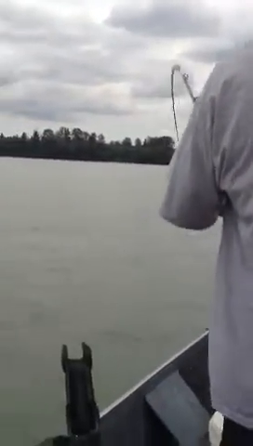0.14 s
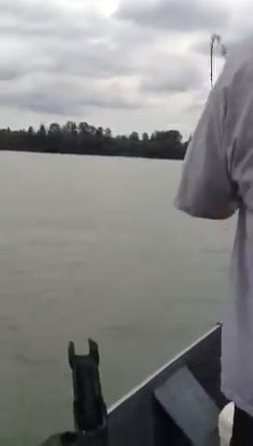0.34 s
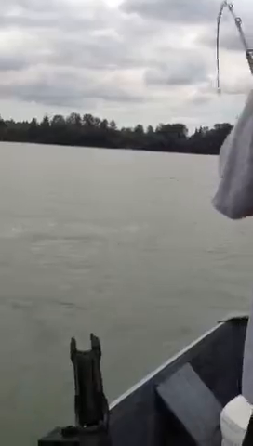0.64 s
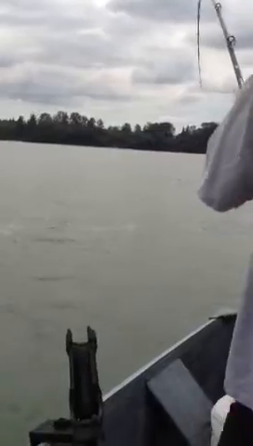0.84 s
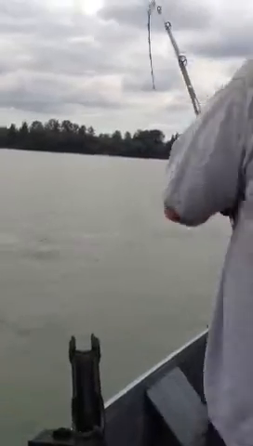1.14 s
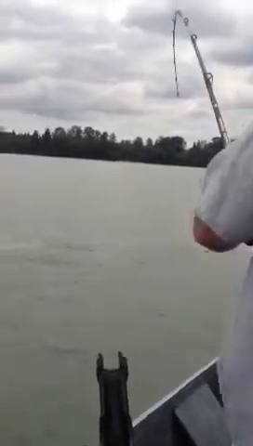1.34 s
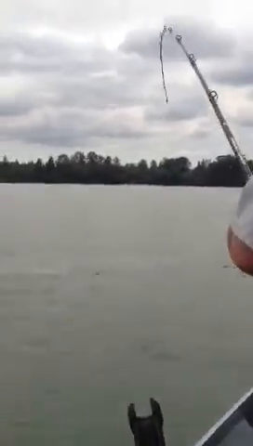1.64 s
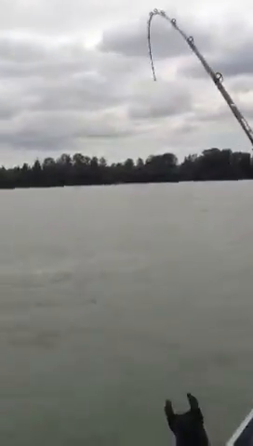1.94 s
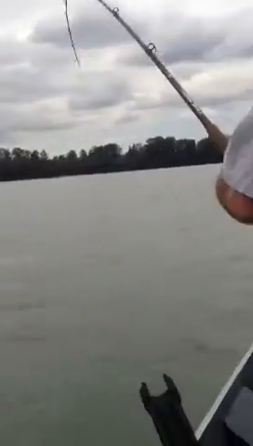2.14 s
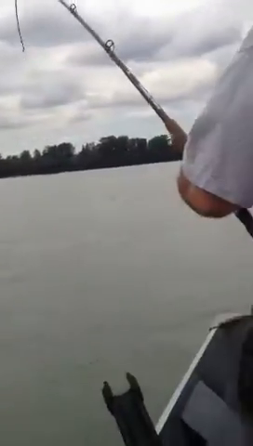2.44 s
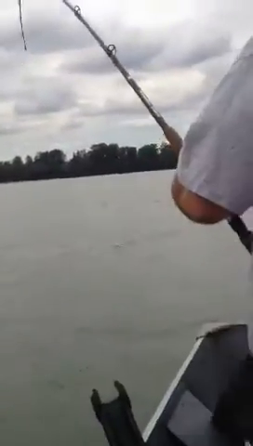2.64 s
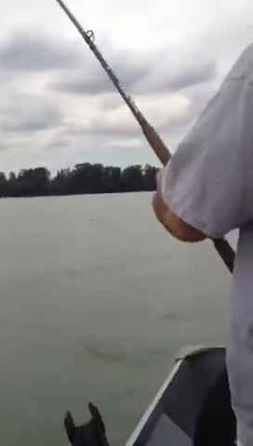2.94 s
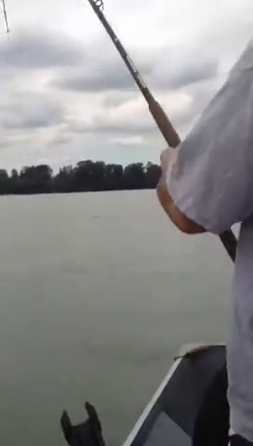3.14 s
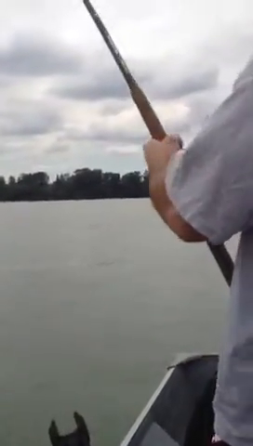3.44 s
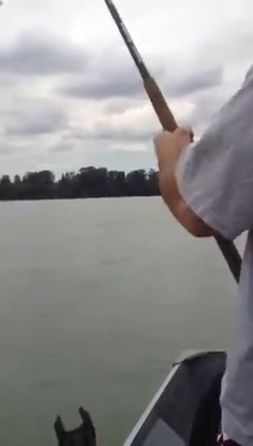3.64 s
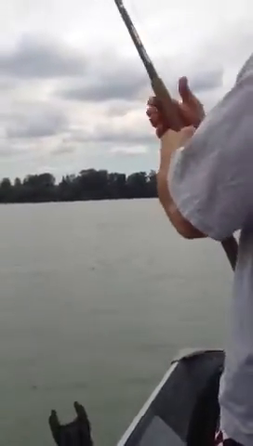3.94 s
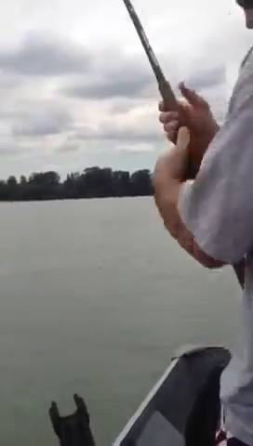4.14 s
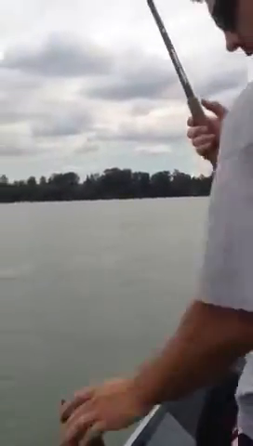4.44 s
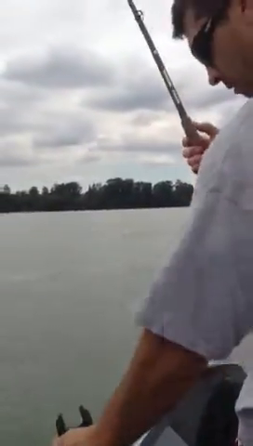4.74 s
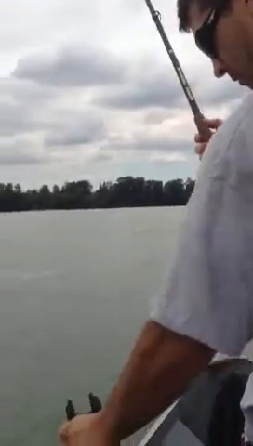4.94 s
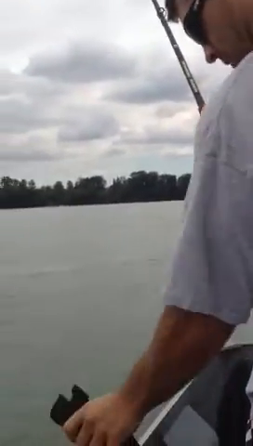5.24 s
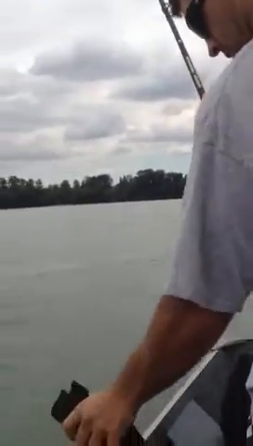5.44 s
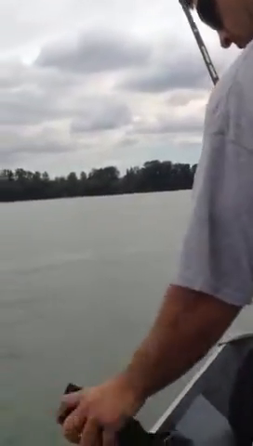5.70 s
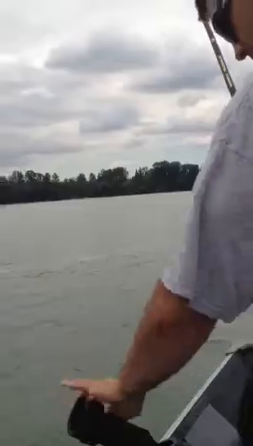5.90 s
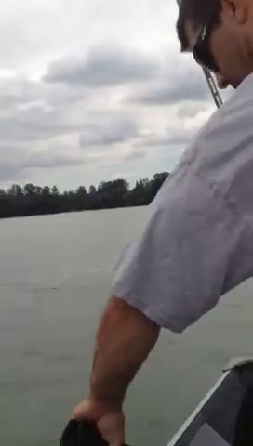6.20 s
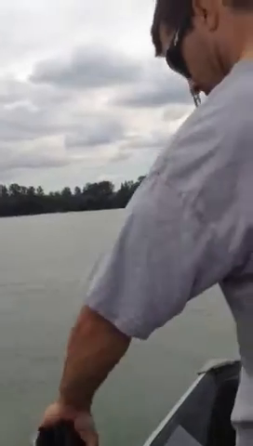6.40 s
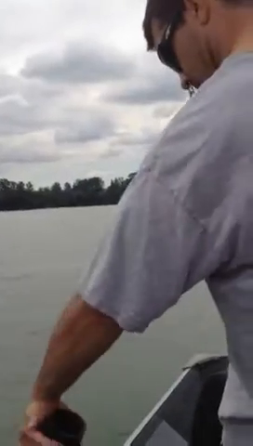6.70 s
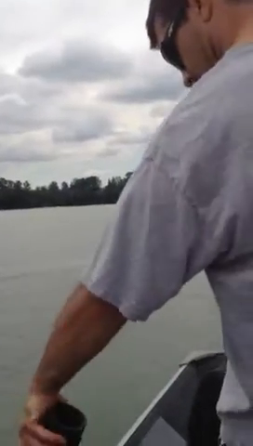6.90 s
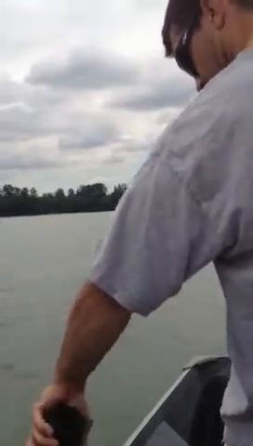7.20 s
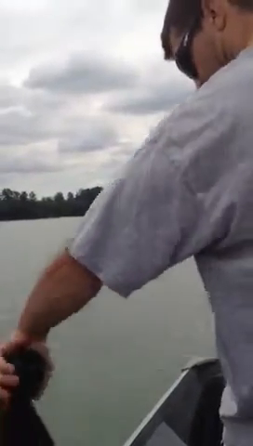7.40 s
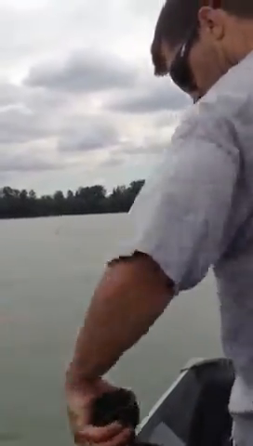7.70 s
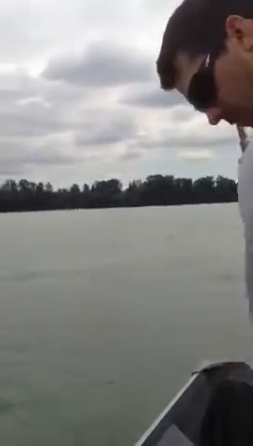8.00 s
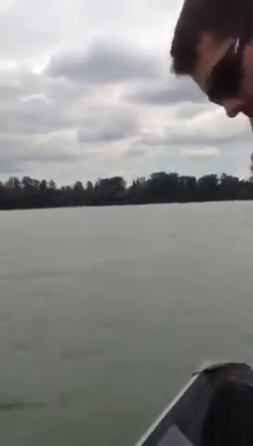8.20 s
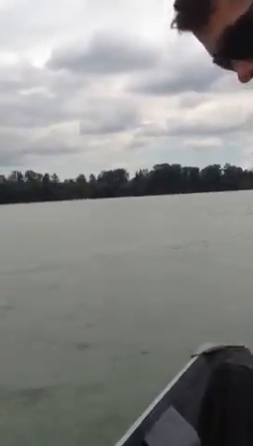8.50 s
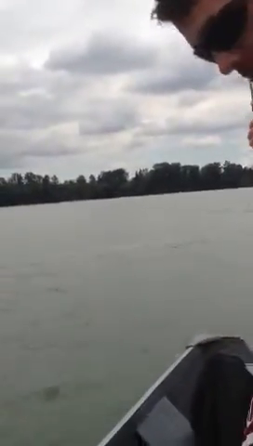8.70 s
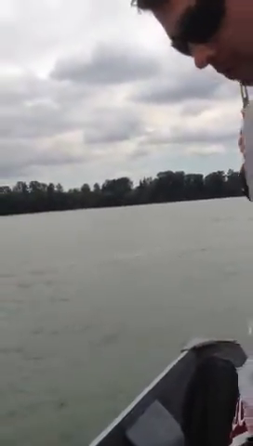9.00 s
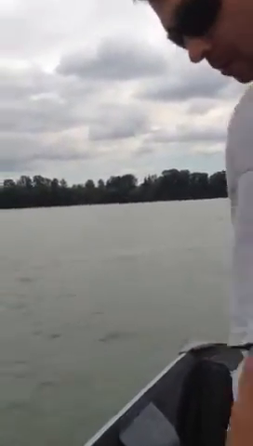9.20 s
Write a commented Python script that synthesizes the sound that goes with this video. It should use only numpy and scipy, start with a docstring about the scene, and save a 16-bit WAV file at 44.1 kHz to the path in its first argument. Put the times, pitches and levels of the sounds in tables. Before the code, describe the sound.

Wavelets slap and gulp against a thin metal hull while fishing gear clicks and rattles, broken by one hard, ringing bang.

```python
"""Angler in a small aluminium boat

Close by in a boat drifting on a calm river, an angler handles his rod and its holder. One loud, hard knock
and two duller ones ring the hull as damped modes and noise; feet push the floor and wavelets trap air pockets.
Tackle clicks and the hollow holder clacks as struck resonances; the reel purrs in runs of ticks.
Line and sleeve swish as swelling noise over murmuring water, pattering droplets and single gliding bubbles.
"""
import sys
import numpy as np
from scipy import signal
from scipy.fft import rfft, irfft, next_fast_len
from scipy.io import wavfile
from scipy.ndimage import map_coordinates

SR = 44100
rng = np.random.default_rng(int(sys.argv[2]) if len(sys.argv) > 2 else 0)


def wav_out(sig):
    """Save sig, one row per channel (or a flat mono array), as 16-bit PCM at SR to the path in sys.argv[1]."""
    wavfile.write(sys.argv[1], SR, np.round(np.clip(np.atleast_2d(sig).T, -1, 1) * 32767).astype(np.int16))


N = 412335  # samples in the scene
T = np.arange(int(0.5 * SR)) / SR  # time within one short sound [s]

# Blows on the hull. Each row: start in seconds, overall level in dB, hardness of the contact in dB,
# level of the struck panel in dB.
KNOCKS = [(4.8807, -13.5, 4, -0.5), (5.697, -26.5, -28, -26), (6.195, -24, -12, -2.5)]
# Wavelets slapping the hull. Each row: first touch in seconds, level of the smack in dB,
# wait until the air pocket closes in seconds, level of the pocket in dB, starting pitch of the pocket in Hz.
SLAPS = [(0.2069, -38.5, .012, -30.5, 727), (0.6521, -44.5, 0.0028, -40.5, 975),
         (1.0143, -42.5, 0.034, -31.5, 720), (1.423, -52, .005, -46, 890), (1.4856, -37, 0.0031, -26, 470),
         (2.2941, -30.5, 0.013, -35.5, 886), (2.4312, -31.5, .002, -35, 938),
         (3.275, -40.5, .026, -33, 597), (4.2979, -30.5, 0.013, -35, 619), (6.767, -58, .003, -38, 410),
         (7.162, -57, .003, -36.5, 708), (7.248, -57.5, 0.00828, -37.5, 477),
         (7.9704, -35.5, 0.0024, -32.5, 548), (8.042, -53, 0.0029, -38.5, 530),
         (9.0391, -43.5, 0.0032, -33, 569), (9.2346, -39, 0.0021, -30.5, 439)]
# Footfalls on the floor. Each row: start in seconds, level in dB before a fixed trim, pitch in Hz,
# change of level from one rebound to the next in dB.
THUDS = [(.559, -28, 141, -2), (0.805, -34, 115, -20), (1.866, -31.5, 138, -12), (2.159, -29, 129, -6.5),
         (4.064, -35.5, 143, -15), (4.169, -42.5, 151, -12), (4.711, -34.5, 163, -16),
         (5.186, -30.5, 162, -5), (5.255, -34, 193, -9), (5.973, -27, 162, -5.5), (6.641, -32.5, 139, -22),
         (7.282, -26.5, 180, -1.5), (8.738, -34.5, 139, -2), (8.78, -26, 222, -11.5), (8.893, -37, 127, -7)]
# Ring time of the hull's sheet metal. Each row: frequency in Hz, time to fall by 60 dB in seconds.
SHEET_T60 = [(120, .42), (450, .29), (1000, .19), (3000, .14), (12000, .12)]


def amp(db):
    """Decibels to gain."""
    return 10 ** (np.asarray(db) / 20)


def unit(x):
    """Scale to rms 1."""
    return x / np.sqrt(np.mean(x ** 2) + 1e-20)


def along(points, hz):
    """Read (Hz, value) points on a logarithmic frequency axis."""
    f, v = np.transpose(points)
    return np.interp(np.log(hz + 1), np.log(f), v)


def fade(t60):
    """Exponential decay by 60 dB in t60 seconds."""
    return np.exp(-np.log(1000) * T / np.maximum(t60, 1e-3))


def filtered(x, response):
    """Multiply the spectrum of x by a response of frequency."""
    m = next_fast_len(len(x) + 8192)
    spectrum = rfft(x, m) * response(np.fft.rfftfreq(m, 1 / SR))
    return irfft(spectrum, m)[:len(x)]


def noise(spectrum, size):
    """Coloured noise of rms 1."""
    white = rng.standard_normal(size)
    return unit(filtered(white, lambda f: amp(along(spectrum, f))))


def resonance(f, hz, q):
    """Causal response of one damped mode."""
    damping = 1j * f * hz / q
    return damping / (hz * hz - f * f + damping)


def lowpass(x, hz, order):
    """Causal low-pass."""
    sos = signal.butter(order, min(hz, SR / 2 - 1), fs=SR, output="sos")
    return signal.sosfilt(sos, x)


def wobble(rate):
    """A smooth random curve with rate knots a second."""
    knots = rng.standard_normal(int(N * rate / SR) + 4)
    return map_coordinates(knots, [np.arange(N) * rate / SR])


def grit(depth_db, rate=700):
    """The uneven strength of many tiny contacts in a row, rate of them a second."""
    knots = np.arange(0, T[-1], 1 / rate)
    strength = np.interp(T, knots, rng.standard_normal(len(knots)))
    return unit(amp(depth_db * strength))


def add(track, s, sound):
    """Mix a sound in at time s."""
    part = track[max(round(s * SR), 0):][:len(sound)]
    part += sound[:len(part)]


def river():
    """Water mumbles under the hull, louder for a moment after each blow; the microphone hisses faintly."""
    # Water under the hull. Each row: frequency in Hz, relative level in dB per Hz.
    rumble = [(25, -28.5), (45, -45), (70, -14), (150, 2.5), (250, -4.5), (450, -11.5), (900, -18),
              (2000, -24), (4000, -65)]
    # Microphone hiss. Each row: frequency in Hz, relative level in dB per Hz.
    hiss = [(100, 8.5), (5000, -3), (9500, -14), (14000, -8.5)]
    rest_db, wash_db, wash_s = -58.5, -65, 0.16  # at rest; stirred by a blow, and time to its height
    t = np.arange(N) / SR
    stir = np.zeros(N)
    # each slap, knock or footfall rocks the boat and stirs the water
    for row in SLAPS + KNOCKS + THUDS:
        u = np.maximum(t - row[0], 0) / wash_s
        stir += (u * np.exp(1 - u)) ** 2
    level = np.sqrt(amp(rest_db) ** 2 + amp(wash_db) ** 2 * stir)
    murmur = level * amp(1.8 * wobble(22)) * noise(rumble, size=N)
    return murmur + amp(-68.5) * noise(hiss, size=N)


def ripples(count=170, cycles=35):
    """Tiny droplets patter at random around the boat, each smeared by the hull's reflections."""
    out = np.zeros(N)
    short = T[:SR // 10]
    for when, pitch, size in rng.random((count, 3)):
        hz = 5700 * 2 ** (-2.4 * pitch ** 6)  # most are tiny and high, a few ring low
        drop = np.sin(2 * np.pi * hz * short) * fade(cycles / hz)[:len(short)]
        reflections = rng.standard_normal(len(short)) * fade(0.042)[:len(short)]
        drop = signal.fftconvolve(drop, reflections)
        add(out, when * N / SR, amp(-62 + 9.1 * size ** 2) * drop / np.abs(drop).max())
    return out


def bubbles():
    """Single air bubbles beside the boat glide in pitch as they change shape."""
    # Each row: start in seconds, level in dB, starting pitch in Hz, ratio of end to start pitch,
    # length in seconds.
    bubble_rows = [(5.452, -56, 810, 0.92, 0.027), (5.488, -51.5, 980, 0.88, 0.018),
                   (5.532, -53.5, 545, 3.4, 0.076), (5.559, -56.5, 1304, 0.65, 0.032),
                   (6.136, -53, 803, 1.1, 0.035)]
    out = np.zeros(N)
    for s, db, hz, ratio, length in bubble_rows:
        u = np.minimum(T / length, 1)
        swell = np.sin(np.pi * u ** 0.38)
        phase = 2 * np.pi * np.cumsum(hz * ratio ** (u * u)) / SR
        add(out, s, amp(db) * swell * np.sin(phase))
    return out


def line():
    """Each pull of line gathers speed, swishes through the rod guides and slows, over a faint steady hiss."""
    # Each row: moment of fastest slide in seconds, level in dB, time scale of gathering speed in seconds.
    pulls = [(.56, -60.5, .27), (1.52, -54.5, 0.28), (2.97, -67, 0.054), (4.14, -68.5, 0.2),
             (5.051, -64.5, 0.22), (6.498, -64.5, 0.57), (7.06, -64, .07), (8.2, -68, 0.35),
             (9.33, -57, 0.17)]
    # Swishes and the hiss under them. Each row: frequency in Hz, relative level in dB per Hz.
    swish = [(500, 1.5), (1500, -0.5), (3000, -8.5), (4300, 0), (5300, 2.5), (6500, -11.5), (9000, -17.5),
             (15000, -38)]
    stop_s, floor_db = 0.2, -70.5  # time scale of slowing; faint steady hiss of the same colour
    t = np.arange(N) / SR
    power = np.full(N, amp(floor_db) ** 2)
    for s, db, rise in pulls:
        width = np.where(t < s, rise, stop_s)
        power += (amp(db) * np.exp(-((t - s) / width) ** 2)) ** 2
    uneven_db = 1.6 * wobble(35) + 2.5 * wobble(400)
    return np.sqrt(power) * amp(uneven_db) * noise(swish, size=N)


def reel():
    """The pawl drops off each ratchet tooth: short ticks that share part of their sound and vary in strength."""
    # Short runs. Each row: start in seconds, length in seconds, level in dB, ticks per second.
    runs = [(8.107, 0.098, -55.5, 110), (8.395, 0.095, -57, 186)]
    # Tick of the pawl. Each row: frequency in Hz, relative level in dB per Hz.
    pawl = [(200, -6), (450, 12.5), (1300, -3), (2200, 2), (3200, 8.5), (4200, -4), (5600, 7), (7000, -49),
            (14000, -47)]
    out = np.zeros(N)
    for s, length, db, rate in runs:
        run = np.zeros(len(T))
        common = noise(pawl, size=len(T))  # the part that every tick of a run shares
        for when in np.arange(0, length, 1 / rate):
            tick = (common + noise(pawl, size=len(T))) * fade(0.009)
            add(run, when, rng.uniform(0.6, 1.3) * tick)
        add(out, s, amp(db) * run / np.sqrt(np.mean(run[T < length] ** 2)))
    return out


def rubs():
    """Sleeve and hands rub over the gear; each stroke swells as it gathers speed and stops short."""
    # Each row: start in seconds, length in seconds, level in dB.
    strokes = [(7.229, 0.096, -54.5), (7.94, 0.046, -55.5), (8.842, 0.17, -53.5)]
    # Cloth on gear. Each row: frequency in Hz, relative level in dB per Hz.
    cloth = [(700, -9), (1500, -2), (3500, -5.5), (5500, 3.5), (7500, -9), (11000, -16), (15000, -20)]
    out = np.zeros(N)
    for s, length, db in strokes:
        u = np.minimum(T / length, 1)
        swell = np.sqrt(np.abs(np.sin(np.pi * u ** 2)))
        add(out, s, amp(db) * swell * grit(depth_db=4.0, rate=236) * noise(cloth, size=len(T)))
    return out


def clacks():
    """The hollow plastic rod holder rattles briefly in its mount and sounds its cavity."""
    # Each row: start in seconds, level in dB before a fixed trim, cavity pitch in Hz.
    clack_rows = [(0.2081, -36, 1090), (1.456, -37, 1110), (2.4344, -42, 1000), (3.0186, -38.5, 2930),
                  (6.2514, -48, 1310), (6.279, -42.5, 2070), (6.538, -41, 1370), (7.0804, -29, 950),
                  (7.9967, -35, 2400), (8.047, -39.5, 1150), (8.483, -38, 1050), (8.9096, -45.5, 1580),
                  (8.973, -35, 1195), (9.234, -40, 1210), (9.333, -43, 1480)]
    # Rattle of the holder. Each row: frequency in Hz, relative level in dB per Hz.
    holder = [(300, 13.5), (700, 3.5), (1000, 9.5), (1450, 2.5), (2050, 7.5), (2700, -6), (4500, -3),
              (9000, -23), (15000, -45.5)]
    cavity_db, q, octave_db = -3, 18, -13  # hollow tone, its sharpness and its octave
    out = np.zeros(N)
    for s, db, hz in clack_rows:
        hollow = filtered(
            rng.standard_normal(len(T)),
            lambda f: resonance(f, hz, q) - amp(octave_db) * resonance(f, 2 * hz, q))
        rattle = noise(holder, size=len(T)) * grit(depth_db=3.5)
        clack = (rattle + amp(cavity_db) * unit(hollow)) * fade(0.13)
        add(out, s, amp(db - 8.5) * clack * (1 - np.exp(-T / 0.00065)))
    return out


def click(hz, clatter):
    """A sharp contact and a quick bounce, then a gritty scatter around one resonance and a broad lower one."""
    ping_t60, rattle_t60 = 0.05, 0.13  # [s] the more it clatters, the longer it lasts
    contacts = 0.31 * fade(0.00092)
    bounce = 0.0065 * rng.uniform(0.099, 0.54)  # [s] after the first contact
    add(contacts, bounce, 0.5 * fade(0.0021))
    scatter = grit(depth_db=4.5) * fade(ping_t60 + clatter * (rattle_t60 - ping_t60))
    burst = rng.standard_normal(len(T)) * (contacts + scatter)
    tick = filtered(burst, lambda f: resonance(f, hz, 15) + 0.33 * clatter * resonance(f, hz * 0.77, 1.3))
    tick = lowpass(tick, 5620, order=6) + 0.14 * tick  # a little of the treble stays
    return amp(-10.5) * tick / np.sqrt(np.mean(tick[T < 0.008] ** 2))


def clicks():
    """Tackle clicks, each piece at its own pitch, and settles with a softer touch."""
    # Each row: start in seconds, level in dB before click's own trim, pitch in Hz,
    # clatter from 0 (a clean ping) to 1 (a broad rattle).
    click_rows = [(0.221, -35, 5400, 0), (0.457, -44.5, 6060, .5), (.567, -37, 4930, 0.14),
                  (.583, -33, 5430, 0.14), (.656, -39, 2040, 0.2), (0.8023, -40, 2270, 0.6),
                  (1.127, -44.5, 3670, 0.8), (1.594, -37.5, 4760, 0.45), (1.737, -40, 5260, 1),
                  (2.0508, -42, 4320, 0), (2.7686, -38.5, 4340, 1), (2.8082, -44, 4220, 0),
                  (2.9088, -43.5, 5140, 0.1), (3.0158, -27, 4700, 0.38), (3.0902, -37, 4760, .3),
                  (3.579, -40.5, 4900, 1), (3.644, -41.5, 5300, 0.3), (3.827, -46, 2250, 0.5),
                  (4.785, -42.5, 2900, 0.6), (5.016, -36.5, 5470, 0.05), (5.1155, -40.5, 4200, 1),
                  (5.1982, -37, 4360, 0.5), (5.349, -35.5, 4860, 0), (5.3964, -39, 3680, 1),
                  (5.4407, -42.5, 4840, 0.56), (5.4786, -43.5, 3870, 0.3), (6.575, -41.5, 5100, .5),
                  (7.184, -45.5, 2920, 0.2), (7.219, -38.5, 4970, 0.05), (7.3063, -42, 4080, .7),
                  (7.998, -31.5, 5070, 0.68), (8.1655, -36, 2270, 0.03), (8.5707, -47.5, 4550, 0.2),
                  (9.1985, -41.5, 4720, 0.3)]
    out = np.zeros(N)
    for s, db, hz, clatter in click_rows:
        add(out, s, amp(db) * click(hz, clatter))
        settle = 0.051 * (0.5 + rng.random())
        add(out, s + settle, amp(db - 19.5) * click(hz, clatter))
    return out


def sheet():
    """Countless overlapping sheet metal modes; the high ones die first."""
    # Dense ring of the metal. Each row: frequency in Hz, relative level in dB per Hz.
    sheet_colour = [(50, -46), (100, -20.5), (170, 4.5), (550, -3.5), (720, -10), (1400, -11.5),
                    (2900, -20), (5200, -11), (7000, -29), (15000, -40)]
    hz, t, z = signal.stft(noise(sheet_colour, size=len(T)), SR, nperseg=256)
    decay = np.exp(-np.log(1000) * t / along(SHEET_T60, hz)[:, None])
    return signal.istft(z * decay, SR, nperseg=256)[1][:len(T)]


def hull():
    """Bending waves spread through the hull and ring it anew at each blow."""
    # Long modes. Each row: frequency in Hz, mean level in dB relative to the other modes.
    hull_modes = [(119, -20), (143, -14), (173, -9), (192, -14), (218, -14), (246, -14), (275, -11),
                  (303, -11), (361, -9), (392, -12), (416, -7), (484, -10), (509, -10), (562, -6),
                  (622, -15), (707, -19), (836, -21), (905, -19), (1013, -18), (1252, -21)]
    hz, db = np.transpose(hull_modes)[:, :, None]
    phase = rng.uniform(0, 2 * np.pi, hz.shape)
    strength = amp(db + rng.standard_normal(hz.shape))  # varies by about 1 dB from blow to blow
    modes = strength * fade(along(SHEET_T60, hz)) * np.sin(2 * np.pi * hz * T + phase)
    spreading = 1 - np.exp(-T / 0.00053)
    return (amp(-3) * modes.sum(0) + amp(-6) * sheet()) * spreading


def thuds(count=3):
    """Soft heavy pushes of the feet swing the floor, rebound and faintly stir the hull."""
    push_s, rebound_s = 0.042, 0.029  # length of one push; interval of the rebounds
    out = np.zeros(N)
    u = T / push_s * 3.8
    for s, db, hz, rebound_db in THUDS:
        push = u ** 2 * np.exp(1 - u ** 2) * np.sin(2 * np.pi * hz * T)
        for k in range(count):
            add(out, s + k * rebound_s, amp(db - 7 + k * rebound_db) * push)
        add(out, s, amp(db - 11.5) * lowpass(hull(), 260, order=2))
    return out


def gulp(pocket_hz, count=24, sag=1.88):
    """One big air pocket and many small ones ring ever lower, the hull booms and spray falls back."""
    # Spray falling back. Each row: frequency in Hz, relative level in dB per Hz.
    spray_colour = [(400, -15), (850, -1.5), (1300, 1), (2300, -11.5), (3200, -16.5), (5200, -12.5),
                    (7000, -17), (15000, -32)]
    slap_s = 0.23  # time scale of the small pockets and the spray
    water, short = np.zeros(len(T)), T[:SR // 10]
    for k, (when, pitch) in enumerate(rng.random((count, 2))):
        delay = slap_s * 0.7 * ((k + when) / count) ** 1.8  # crowded at first, then sparser
        hz = pocket_hz * np.exp(0.199 * (4 * pitch - 2) - sag * delay)
        decay = np.exp(-np.log(1000) * short * hz / 22)  # falls by 60 dB in 22 cycles
        pocket = np.sin(2 * np.pi * hz * short) * decay * (1 - np.exp(-short * hz))
        add(water, delay, (-1) ** k * np.exp(-4.5 * delay / slap_s) * pocket)
    phase = 2 * np.pi * np.cumsum(pocket_hz * np.exp(-sag * T)) / SR
    big = np.sin(phase) * fade(0.24) * (1 - np.exp(-T / 0.0022))
    air = amp(-7) * (water / np.abs(water).max() + big * grit(depth_db=9.5, rate=276))

    octaves = np.log2(pocket_hz / 706)  # from a middling pocket
    # big, low pockets push the hull harder; small, high ones throw more spray
    boom = amp(-6 - 4.5 * octaves) * lowpass(hull(), pocket_hz * 0.67, order=2)
    spray = noise(spray_colour, size=len(T)) * grit(depth_db=3.5) * fade(slap_s * 0.8)
    return air + boom + amp(-19.5 + 14.5 * octaves) * spray


def slaps():
    """The crest smacks the metal, the air pocket closes, and the wavelet's back follows lower and softer."""
    out = np.zeros(N)
    for s, smack_db, wait, db, hz in SLAPS:
        add(out, s, amp(smack_db) * click(hz=4800, clatter=0.85))  # a crest on metal: a broad click
        add(out, s + wait, amp(db) * gulp(hz))
        add(out, s + wait + 0.048, amp(db - 11) * gulp(hz * 0.92))
    return out


def ring(modes, rise_cycles):
    """Modes struck together build up over a part of a swing or more; neighbours swing in opposite directions."""
    out = np.zeros(len(T))
    for k, (hz, db, t60) in enumerate(modes):
        build_up = 1 - np.exp(-T * hz / rise_cycles)
        out += (-1) ** k * amp(db) * fade(t60) * build_up * np.sin(2 * np.pi * hz * T)
    return out


def knocks():
    """The fitting grazes and clacks, the panel under it flexes, then the whole hull rings."""
    # Struck panel, quickly damped. Each row: frequency in Hz, relative level in dB, time to fall by 60 dB in s.
    panel_modes = [(277, 6.5, 0.033), (400, 16.5, 0.0229), (532, 13, 0.038), (1120, 2.5, 0.028),
                   (1435, -1.5, 0.026)]
    # Metal fitting's clack. Each row: frequency in Hz, relative level in dB, time to fall by 60 dB in s.
    fitting_modes = [(3820, 3.5, 0.0078), (4300, 2.5, 0.018), (5090, 3.5, 0.017), (6040, -3, 0.021),
                     (8450, -37, 0.014)]
    lead = 0.0079  # [s] the light first touch comes this much earlier
    out = np.zeros(N)
    for s, db, hard_db, panel_db in KNOCKS:
        crack = amp(-2.5) * lowpass(rng.standard_normal(len(T)), 8300, order=2) * fade(0.0025)
        contact = amp(-7.5) * ring(fitting_modes, rise_cycles=0.2) + crack
        panel = ring(panel_modes, rise_cycles=1.2)
        body = lowpass(hull(), 12000 * amp(hard_db), order=2)  # a soft contact excites less treble
        add(out, s, amp(db) * (amp(hard_db) * contact + amp(panel_db) * panel + body))
        add(out, s - lead, amp(db + hard_db - 19) * lowpass(sheet(), 1200, order=1))
    return out


def scene():
    """Everything heard from inside the boat."""
    water = river() + ripples() + bubbles()
    gear = line() + reel() + rubs() + clacks() + clicks()
    boat = thuds() + slaps() + knocks()
    return (water + gear + boat)[None]


def record(dry):
    """The small microphone loses deep bass and keeps nothing above its band limit."""
    top_hz = 15400
    thin = signal.sosfilt(signal.butter(3, 56, "high", fs=SR, output="sos"), dry[0])
    return filtered(thin, lambda f: f < top_hz)[None]


dry = scene()
out = record(dry)
wav_out(out)
```